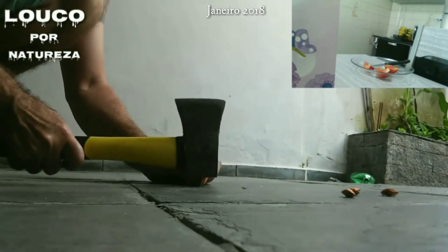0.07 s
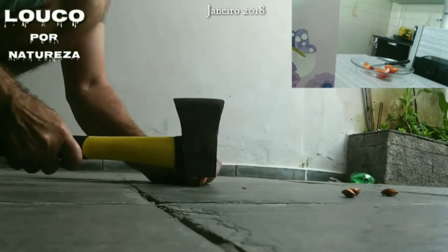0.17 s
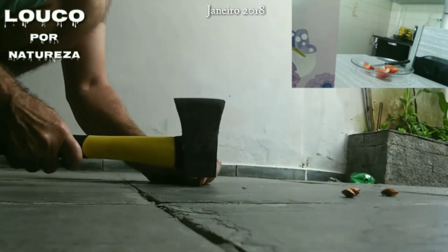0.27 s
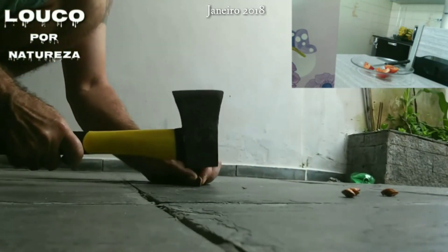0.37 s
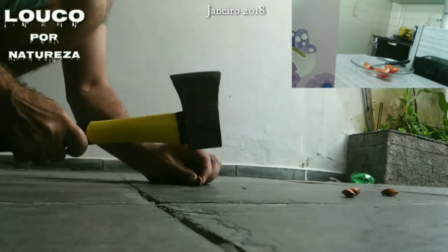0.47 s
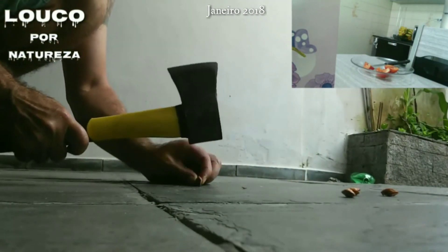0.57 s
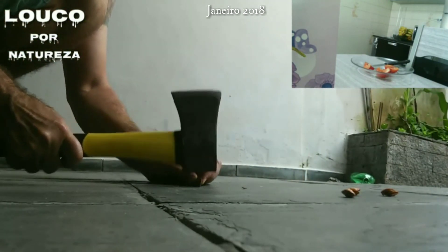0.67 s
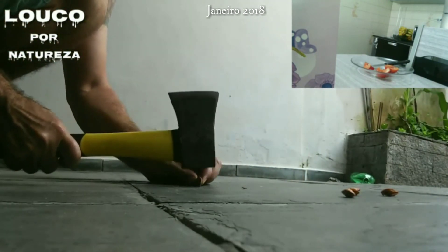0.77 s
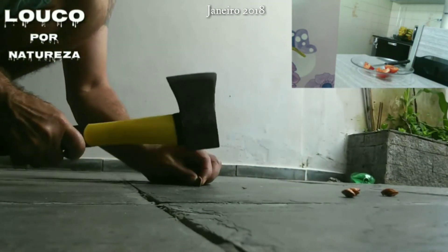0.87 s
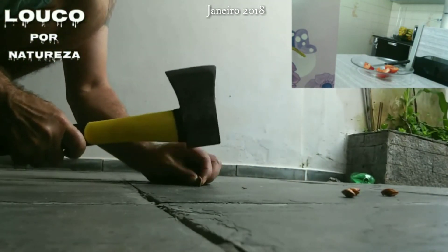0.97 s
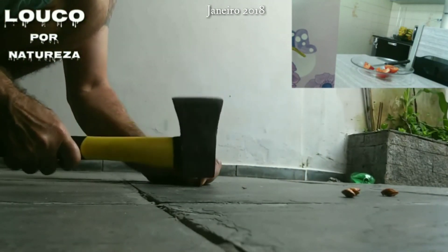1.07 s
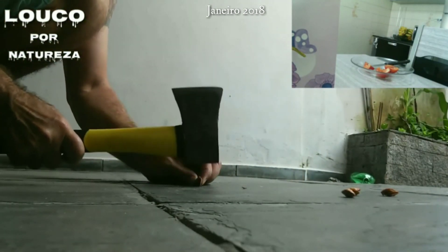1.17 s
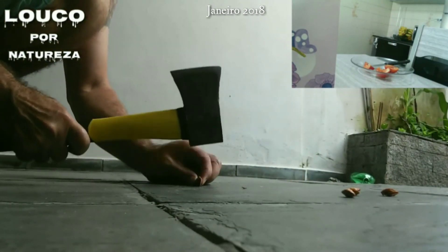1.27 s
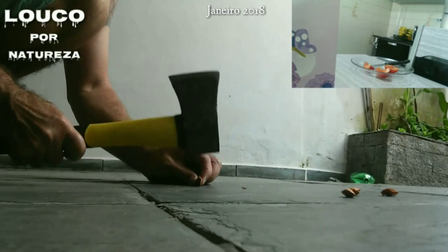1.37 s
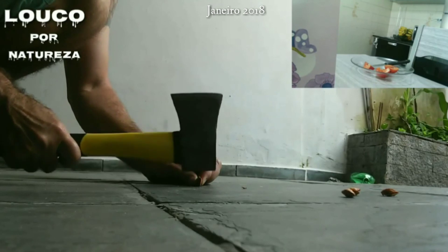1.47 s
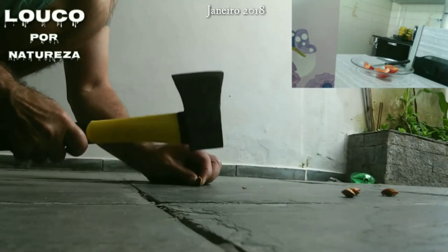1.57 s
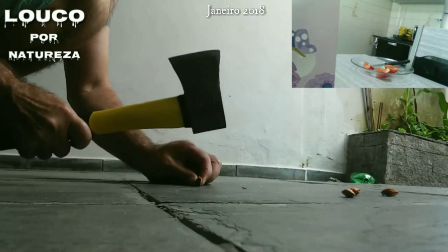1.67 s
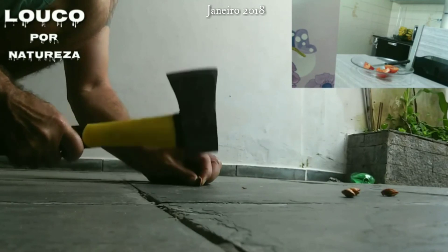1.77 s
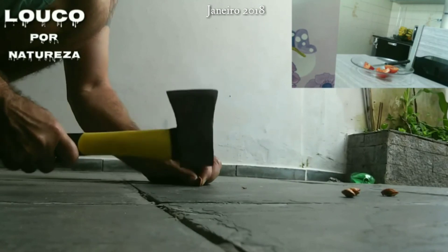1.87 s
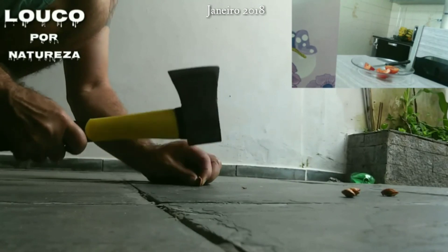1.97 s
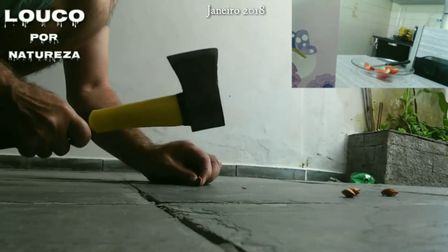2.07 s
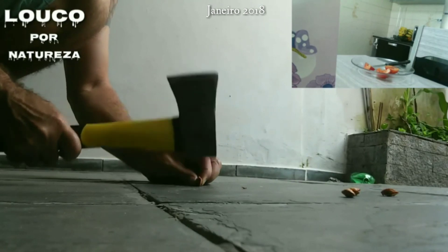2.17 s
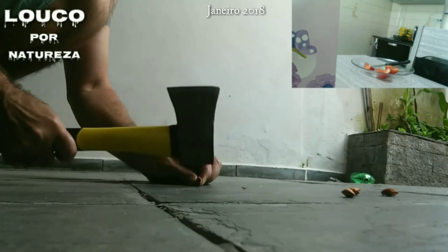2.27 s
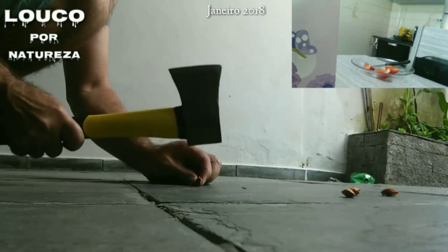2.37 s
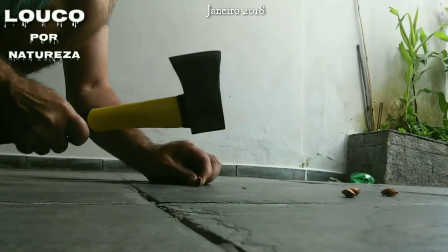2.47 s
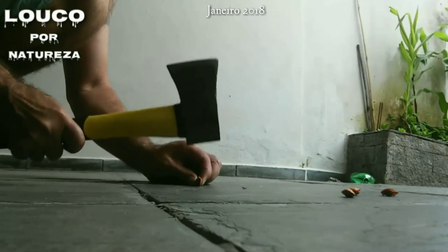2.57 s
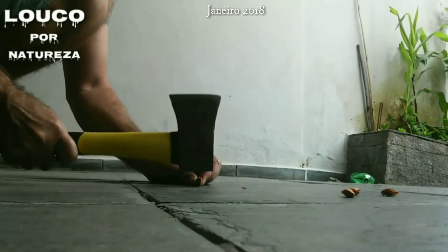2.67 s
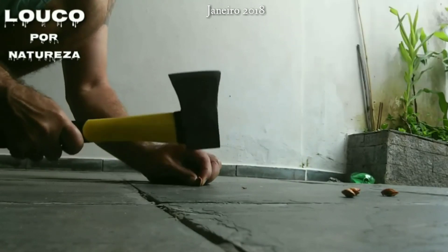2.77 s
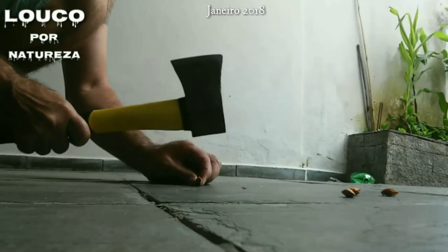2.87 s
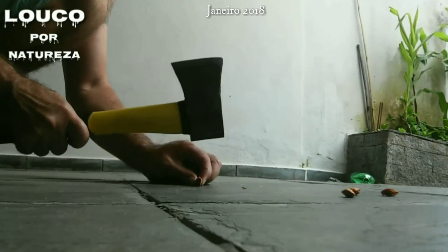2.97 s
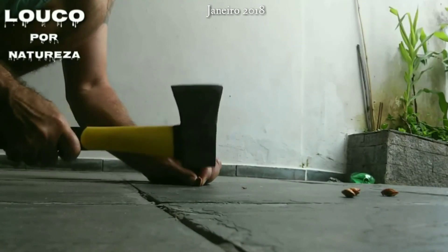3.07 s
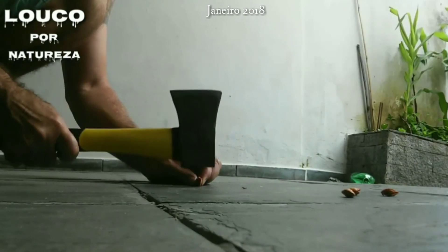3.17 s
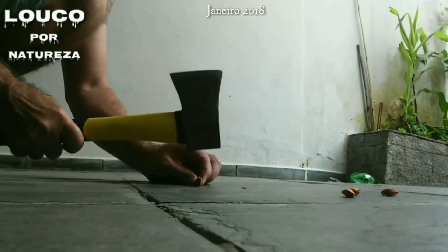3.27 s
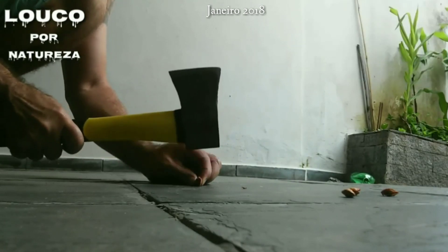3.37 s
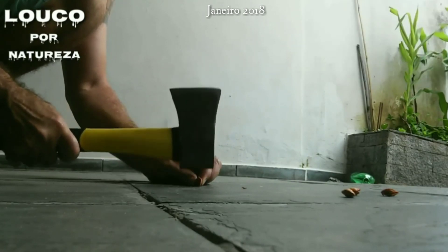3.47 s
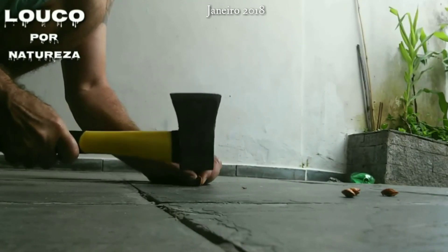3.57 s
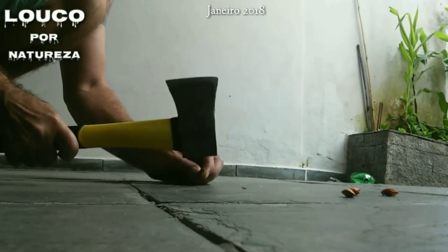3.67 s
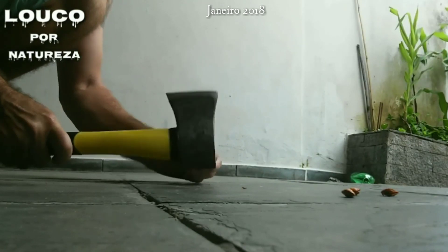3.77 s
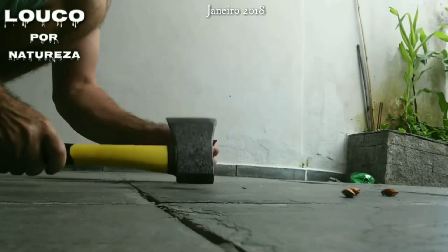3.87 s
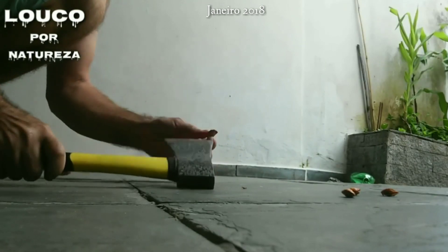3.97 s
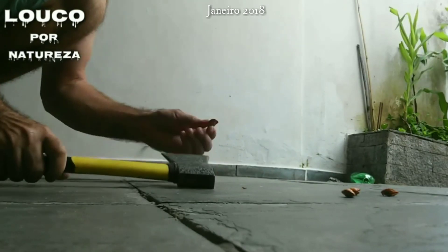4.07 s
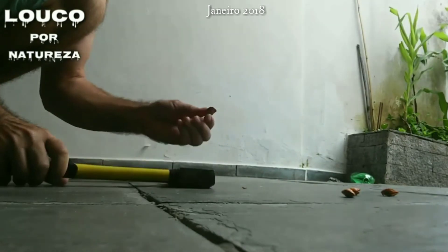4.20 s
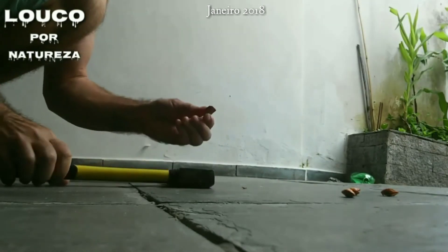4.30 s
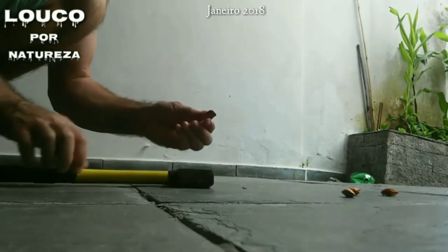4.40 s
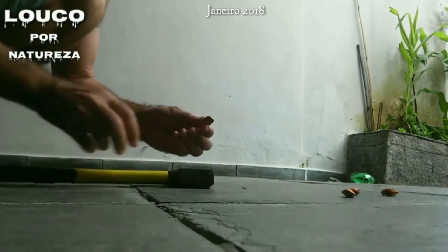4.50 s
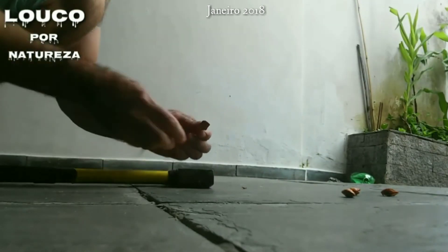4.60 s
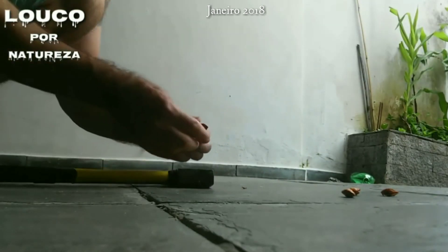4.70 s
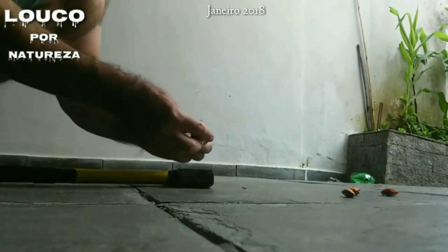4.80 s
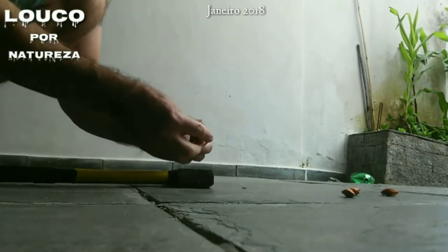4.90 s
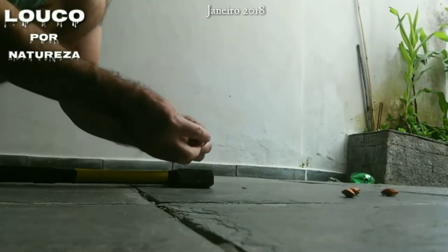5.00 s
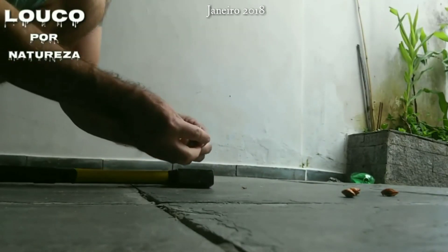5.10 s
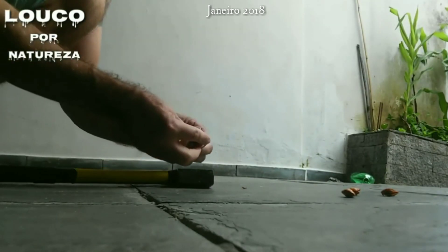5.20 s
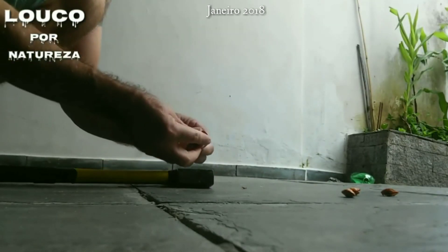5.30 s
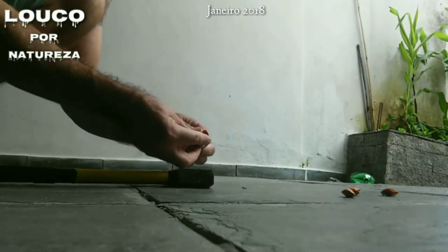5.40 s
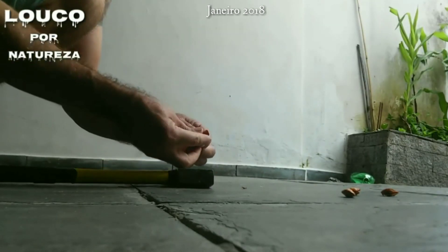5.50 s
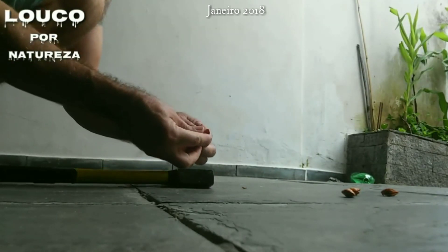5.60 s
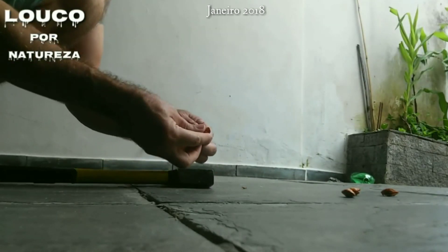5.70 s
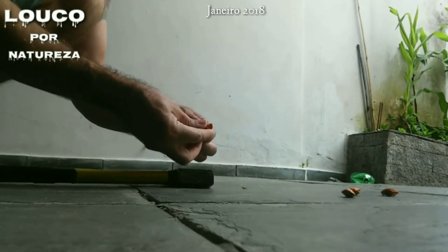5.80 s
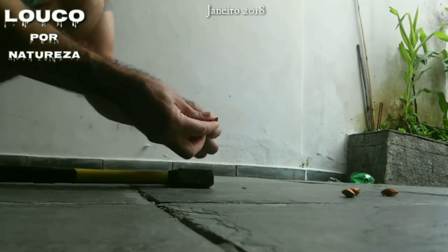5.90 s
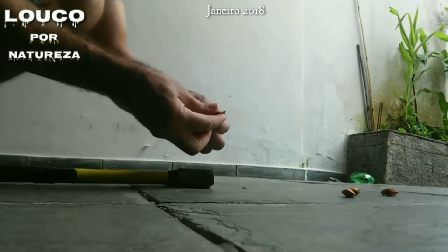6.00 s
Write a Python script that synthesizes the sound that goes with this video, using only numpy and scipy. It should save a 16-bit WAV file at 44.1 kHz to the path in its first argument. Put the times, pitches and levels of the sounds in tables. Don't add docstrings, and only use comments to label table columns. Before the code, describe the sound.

Spaced knocks on a hard nut-like stone build to sharp cracking blows in a walled yard, then a metal head clanks onto tile.

```python
import sys
import numpy as np
from scipy import signal
from scipy.fft import rfft, irfft
from scipy.io import wavfile
from scipy.ndimage import uniform_filter1d, map_coordinates

SR = 44100
rng = np.random.default_rng(int(sys.argv[2]) if len(sys.argv) > 2 else 0)


def ratio_of_db(decibels):
    return 10 ** (np.asarray(decibels, float) / 20)


def log_audio(samples):
    frames = np.atleast_2d(samples).T
    limited = np.clip(frames, -1, 1)
    pcm = np.round(limited * 32767).astype(np.int16)
    wavfile.write(sys.argv[1], SR, pcm)


N = 266760


def unit(x):
    return x / np.sqrt(np.mean(x ** 2) + 1e-20)


def along(points, hz):
    f, v = np.transpose(points)
    return np.interp(np.log(hz + 1e-3), np.log(f), v)


def curves(rows, out=-140):
    s, *cols = np.transpose(rows)
    return [np.interp(np.arange(N) / SR, s, c, right=out) for c in cols]


def wobble(rate):
    knots = rng.standard_normal(int(N * rate / SR) + 4)
    return map_coordinates(knots, [np.arange(N) * rate / SR])


def fall(start_s, hold_s, db_per_s):
    t = np.arange(N) / SR - start_s
    return np.minimum(0, 2000 * t) - db_per_s * np.maximum(0, t - hold_s)


def noise(spectrum):
    hz = np.fft.rfftfreq(N, 1 / SR)
    return unit(irfft(rfft(rng.standard_normal(N)) * ratio_of_db(along(spectrum, hz)), N))


def patchy(x, depth_db):
    z = signal.stft(x, nperseg=512)[2]
    field = uniform_filter1d(rng.standard_normal(z.shape), size=4, axis=0)
    field = uniform_filter1d(field, size=40, axis=1)
    return unit(signal.istft(z * ratio_of_db(depth_db * unit(field)), nperseg=512)[1][:N])


def pulse(gain):
    size = 4096
    cepstrum = irfft(np.log(gain(np.fft.rfftfreq(size, 1 / SR)) + 1e-6))
    cepstrum[1:size // 2] *= 2
    cepstrum[size // 2 + 1:] = 0
    click = irfft(np.exp(rfft(cepstrum)))[:size // 2]
    return click / np.linalg.norm(click)


def burst(t60):
    x = rng.standard_normal(400) * ratio_of_db(-60 * np.arange(400) / SR / t60)
    return x / np.linalg.norm(x)


def add(track, s, x):
    part = track[round(s * SR):][:len(x)]
    part += x[:len(part)]


# frequency in [Hz], t60 in [s].
YARD_DECAY = [(100, 0.62), (300, 0.42), (1000, 0.56), (3000, 0.55), (7000, 0.44), (15000, 0.35)]


def yard(x, wet_db):
    size = 3 * SR // 4
    hz, t, z = signal.stft(rng.standard_normal(size), SR, nperseg=256)
    z *= ratio_of_db(-60 * t / along(YARD_DECAY, hz)[:, None])
    tail = signal.istft(z, SR, nperseg=256)[1][:size]
    t = np.arange(size) / SR
    tail *= 1 - np.exp(-(t / 0.0079) ** 2)
    tail *= ratio_of_db(0.83 * np.exp(-t / 0.11))
    return signal.fftconvolve(x, ratio_of_db(wet_db) * tail / np.linalg.norm(tail))


# time in [s], dip in [dB].
GAIN_DIPS = [
    (1.6665, 4),
    (2.056, 2.5),
    (2.4443, 11.5),
    (2.88, 4),
    (4.428, 12.5),
]


def duck_at(s):
    return sum(max(db, 0) for at, db in GAIN_DIPS if abs(at - s) < .02)


def gain_dip_db():
    t = np.arange(N) / SR
    return sum(max(db, 0) * (t >= s - .003) * np.exp(-(np.clip(t - s, 0, None) / 0.091) ** 2)
               for s, db in GAIN_DIPS)


# frequency in [Hz], level in [dB].
SELF_NOISE = [(12, -36), (20, -10), (33, -27), (64, -2.5), (97, -10), (195, -14.5), (360, -23),
              (531, -17.5), (593, -25.5), (783, -19), (1220, -30), (1900, -33.5), (15300, -40)]


def self_noise():
    return ratio_of_db(-72) * noise(SELF_NOISE)


# frequency in [Hz], level in [dB].
PREAMP_HISS = [(300, -17), (2000, -11.5), (8000, 3.5), (15000, -9.5)]


def gate_hiss(x):
    power = signal.lfilter([1 / 800], [1, 1 / 800 - 1], np.diff(x, prepend=0) ** 2)
    level_db = 10 * np.log10(np.abs(power) + 1e-12)
    return ratio_of_db(np.minimum(-60, 0.72 * level_db - 27)) * noise(PREAMP_HISS)


# time in [s], firing note in [Hz], level in [dB].
FAR_ENGINE = [(0.0, 108.8, -34), (0.078, 104.8, -49.5), (0.374, 102.4, -33.5), (0.536, 102.9, -46),
              (0.73, 102.3, -34.5), (0.828, 102.5, -41), (0.872, 98.8, -47), (0.92, 91.8, -68),
              (0.95, 86.8, -54)]
# frequency in [Hz], level in [dB].
STREET_RUMBLE = [(12, -38), (20, -12), (59, 9.5), (107, 2.5), (130, -16), (247, -16.5), (300, -13.5),
                 (390, -51), (660, -120)]
STREET_RUSH = [(76, -35.5), (130, 5), (307, -4.5), (339, -10), (515, -1), (604, -6), (1080, -13),
               (1340, -26.5), (1450, -18.5), (1960, -24.5), (2440, -22), (5760, -30.5), (6490, -36.5),
               (15300, -51.5)]


def street():
    t = np.arange(N) / SR
    shut_s, shut_db_per_s = 3.45, 129
    leaves_s, leaves_db, leaves_tau_s = 0.79, 26, 0.9
    gate_db = fall(-0.87, 1 + shut_s, shut_db_per_s)
    clank_echo_db = fall(4.45, 0.49, shut_db_per_s)

    hz, engine_db = curves(FAR_ENGINE)
    engine = ratio_of_db(engine_db + 1 + 4.0 * wobble(9)) * np.sin(2 * np.pi * np.cumsum(hz) / SR)

    rumble_db = -45.5 - 4.5 * t + fall(-0.96, 1.1 + shut_s, 1.9 * shut_db_per_s)
    rumble = (ratio_of_db(rumble_db) + ratio_of_db(clank_echo_db - 64.5)) * ratio_of_db(2.3 * wobble(8)) * noise(STREET_RUMBLE)

    gone = 1 - np.exp(-np.maximum(0, t - leaves_s) / leaves_tau_s)
    rush_db = -43.5 - leaves_db * gone + gate_db
    rush = (ratio_of_db(rush_db) + ratio_of_db(-49 + clank_echo_db)) * ratio_of_db(-1.36 + 0.54 * wobble(33))
    return engine + rumble + rush * patchy(noise(STREET_RUSH), depth_db=2.46)


# time in [s], level in [dB].
HAND_SCUFF = [
    (5.0, -83.5),
    (5.1, -65),
    (5.129, -56),
    (5.2, -61),
    (5.26, -71),
    (5.34, -90),
]
# frequency in [Hz], level in [dB].
SCUFF_COLOUR = [(88, -49), (150, -21), (246, -1), (301, -21.5), (1150, -17), (2570, -33.5), (3640, -32.5),
                (4630, -42), (12000, -43), (15600, -66.5), (22000, -120)]


def scuff():
    level_db = curves([(0.0015, -140), *HAND_SCUFF])[0]
    return ratio_of_db(level_db + 1.8 * wobble(70)) * noise(SCUFF_COLOUR)


# time in [s], peak in [dB], pitch in [Hz], resonance width in [Hz], echo in [dB].
CHIP_TICKS = [(0.1, -16, 415, 57.6, -4.5), (1.24, -56.5, 8500, 40, 12), (1.313, -55, 8700, 60, 22),
              (1.313, -44, 3970, 150, 16), (1.82, -28.5, 770, 120, 0), (2.06, -9.5, 3870, 130, -20),
              (2.059, -44.5, 2900, 80, 10.5), (4.188, -63.5, 3660, 40, 12.5), (3.229, -47, 4520, 119, 14),
              (3.24, -42.5, 4700, 120, 4), (3.242, -34.5, 3560, 297, 0), (3.221, -46, 1740, 148, 15),
              (3.248, -51, 9000, 299, 11), (3.352, -44, 4660, 250, 15), (3.351, -38.5, 8550, 900, 18),
              (3.76, -55.5, 7000, 3990, 3), (3.76, -47, 255, 120, 3), (4.408, -35.5, 3640, 700, 13),
              (4.4273, 22, 2710, 250, -11.5), (0.104, -36, 125, 30, -7), (4.606, -12, 860, 700, 13)]


def chips():
    out = np.zeros(N)
    for s, db, hz, width_hz, echo_db in CHIP_TICKS:
        tick = ratio_of_db(db) * pulse(lambda f: f / np.abs(hz ** 2 - f ** 2 + 1j * f * width_hz))
        add(out, s, tick)
        add(out, s, yard(tick, echo_db))
    return out


# time in [s], boom in [dB].
HANDLE_ROCKS = [
    (4.69, -30),
    (4.785, -26.5),
    (4.884, -34.5),
    (4.955, -41.5),
    (5.026, -48.5),
    (5.1, -54),
    (5.19, -63),
]


def handle():
    t = np.arange(N) / SR
    swell_s, lift_s = 0.053, 0.013
    wood_s, wood_hold_s = 4.65, 0.065
    rocking = sum(ratio_of_db(db) * np.exp(-((t - s) / np.where(t < s, swell_s, lift_s)) ** 2)
                  for s, db in HANDLE_ROCKS)

    boom_hz = 75 + 25 * np.exp(-np.abs(t - wood_s) / 0.044) + 3 * wobble(18)
    boom = np.sin(2 * np.pi * np.cumsum(boom_hz) / SR)
    boom += 0.3 * noise([(40, -29.0), (100, 2.5), (220, -1.0), (400, -23), (900, -120)])

    wood = noise([(500, -60), (585, -9), (605, 4.5), (630, -18.5), (720, -62.5)])
    wood *= ratio_of_db(-21.5 - 12.5 + fall(wood_s, wood_hold_s, 267))
    rattle = noise([(150, -26), (450, -10), (900, -17), (2000, -16), (5000, -44.5)])
    rattle *= ratio_of_db(-37.5 + fall(wood_s, wood_hold_s, 99.5))
    return rocking * unit(boom) + wood + rattle


HEAD_HZ = [2375, 2537, 2700, 2838, 2885, 3650, 6890, 6919, 8200, 11250, 13370]
# level in [dB], t60 in [s].
HEAD_MODES = [(-11.5, 0.0078), (-5.5, 0.037), (-1, 0.0064), (-7, 0.04), (-12, .12), (-11.5, 0.045),
              (-11.5, 0.046), (-5.5, 0.093), (-16, 0.034), (-10.5, 0.059), (-19, 0.026)]


def steel(contacts, spectrum, damp_db):
    out, t = np.zeros(N), np.arange(SR // 4) / SR
    clack = pulse(lambda hz: ratio_of_db(along(spectrum, hz)))
    ring = np.zeros(len(t))
    for hz, (db, t60) in zip(HEAD_HZ, HEAD_MODES):
        muted_db = db - damp_db * abs(np.log2(hz / 3100))
        ring += ratio_of_db(muted_db - 60 * t / t60) * np.sin(2 * np.pi * hz * t)
    ring *= 1 - np.exp(-t / 0.00039)
    for s, clack_db, ring_db in contacts:
        sound = ratio_of_db(ring_db) * ring
        add(out, s, ratio_of_db(duck_at(s)) * sound)
        add(out, s, ratio_of_db(duck_at(s) + clack_db + 6) * np.convolve(clack, burst(0.034)))
        add(sound, 0, ratio_of_db(clack_db + 2.5) * clack)
        add(out, s, yard(sound, duck_at(s) + 7))
    return out


# time in [s], clack in [dB], ring in [dB].
EDGE_TOUCHES = [
    (4.187, -26, -46),
    (4.34, -57, -51.5),
    (4.407, -16.5, -50),
]
# frequency in [Hz], level in [dB].
TOUCH_COLOUR = [(40, -39.5), (130, -9), (400, -6), (900, 0), (1600, -8), (2900, -12.5), (3400, -36.5),
                (4900, -43.5), (8000, -65.5), (16000, -87)]
# time in [s], clack in [dB], ring in [dB].
FLAT_LANDINGS = [
    (4.26, -80, -77),
    (4.344, -75.5, -75.5),
    (4.426, 5.5, -14),
    (4.439, -15, -28.5),
]
# frequency in [Hz], level in [dB].
CLACK_COLOUR = [(88, -48), (150, -21.5), (581, -10), (719, -10.5), (1620, -14.5), (1890, -22.5),
                (2840, -0.5), (3450, -12.5), (4790, -4.5), (6400, -15.5), (7060, -20), (7480, -16),
                (11400, -19), (15300, -37.5)]


def hatchet():
    return steel(EDGE_TOUCHES, TOUCH_COLOUR, damp_db=40.5) + steel(FLAT_LANDINGS, CLACK_COLOUR, damp_db=1)


# frequency in [Hz], level in [dB].
TILE_THUD = [(50, -33.5), (100, -13), (156, -4), (205, -5.5), (245, 1), (380, 0.5), (490, -2), (700, -7)]


def colour_db(hz, contact, crack):
    edge_hz, edge_db, lobe_hz, width, lobe_db = contact
    crack_hz, crack_db, fall_db, grit_db = crack
    bounce = np.cos(2 * np.pi * hz / 1363)

    def octaves(ref):
        return np.log2((hz + 1) / ref)

    thud = along(TILE_THUD, hz) - edge_db * np.maximum(0, octaves(edge_hz))
    lobe = lobe_db - 6 * np.abs(octaves(lobe_hz) / width) ** 3
    grit = grit_db - 5.5 * np.abs(octaves(3000)) + 0.5 * bounce
    slopes_db = np.minimum(21.5 * octaves(crack_hz), -fall_db * octaves(crack_hz))
    split = crack_db + slopes_db + 1.5 * bounce
    return 10 * np.log10(sum(ratio_of_db(2 * np.maximum(part, -150)) for part in (thud, lobe, grit, split)))


# time in [s], echo in [dB], push in [dB], push pitch in [Hz], click in [dB].
STONE_BLOWS = [
    (.9290, -10, -27.5, 484, -33.5),
    (1.311, -4, -19, 344, -41),
    (1.668, 1, -7, 393, -30.5),
    (2.058, 5, -6, 462, -13.5),
    (2.4450, 7, -5.5, 620, 7.5),
    (2.8805, 7.5, -6, 619, 1),
    (3.3510, -11, -24, 348, -25.5),
]
# edge in [Hz], fall in [dB an octave], lobe in [Hz], lobe width in [octaves], lobe in [dB].
BLOW_CONTACTS = [(310, 9.5, 490, 0.86, -12), (472, 90, 710, 0.94, -15.5), (620, 69, 1050, 0.259, -21.5),
                 (590, 18, 1520, .17, -20), (504, 47, 816, 0.88, -11.5), (702, 15, 900, 0.63, -13),
                 (448, 51, 880, 0.61, -17)]
# crack in [Hz], crack in [dB], fall above it in [dB an octave], grit at 3 kHz in [dB].
SHELL_CRACKS = [(6000, -36, 12, -29), (8700, -64, 30, -33), (8820, -38.5, 21, -44), (4650, -34.5, 4.5, -38),
                (5150, -6, 9.5, -27), (7300, -6, 25.5, -22.5), (8960, -29, 29, -34)]
# frequency in [Hz], level in [dB].
SNAP_COLOUR = [(300, -36), (1000, -12), (2500, -3.5), (4000, -10), (6500, -5.5), (10000, 1), (16000, -16)]
# frequency in [Hz], level in [dB], t60 in [s].
STONE_MODES = [(1020, -2.5, 0.013), (2370, -12, 0.023), (3712, -16, 0.072), (5004, -13, 0.021),
               (7000, 0.5, 0.0055)]


def blows():
    out, t = np.zeros(N), np.arange(SR // 40) / SR
    snap = pulse(lambda hz: ratio_of_db(along(SNAP_COLOUR, hz)))
    for blow, contact, crack in zip(STONE_BLOWS, BLOW_CONTACTS, SHELL_CRACKS):
        s, echo_db, push_db, push_hz, click_db = blow

        u = t * push_hz / 0.55
        push = (u * np.exp(1 - u)) ** 2 * np.sin(2 * np.pi * push_hz * t)
        add(out, s - .0006, ratio_of_db(push_db + 1.5) * push)
        add(out, s + .0004, ratio_of_db(click_db + 8.5) * np.convolve(snap, burst(0.003)))

        scratch = pulse(lambda hz: ratio_of_db(colour_db(hz, contact, crack) / 2) * hz / (hz + 2000))
        add(out, s, ratio_of_db(echo_db - 16) * np.convolve(scratch, burst(0.017)))

        shifts = rng.uniform(.88, 1.12, len(STONE_MODES))
        modes = np.zeros(len(t))
        for shift, (hz, db, t60) in zip(shifts, STONE_MODES):
            mode_db = colour_db(hz, contact, crack) / 2 + db
            modes += ratio_of_db(mode_db - 60 * t / t60) * np.sin(2 * np.pi * shift * hz * t)
        modes *= (1 - np.exp(-(t / 0.0011) ** 2)) * ratio_of_db(-60 * t / .03)
        add(out, s + 0.00079, ratio_of_db(echo_db) * modes)

        knock = pulse(lambda hz: ratio_of_db(colour_db(hz, contact, crack)))
        add(out, s, yard(knock, echo_db + duck_at(s) + 7.0))
    return out


def scene():
    return (street() + scuff() + chips() + handle() + hatchet() + blows())[None]


def roll_off(x):
    return signal.sosfilt(signal.butter(12, 16810, fs=SR, output="sos"), x)


def record(dry):
    x = dry * ratio_of_db(-gain_dip_db())
    x = x + gate_hiss(x)
    x = x + self_noise()
    band = np.interp(np.fft.rfftfreq(N, 1 / SR), [15300, 15600], [1, .03])
    x = irfft(rfft(x) * band, N)
    x = x / (1 + np.abs(x / .95) ** 6) ** (1 / 6)
    return roll_off(x)


dry = scene()
out = record(dry)
log_audio(out)
```